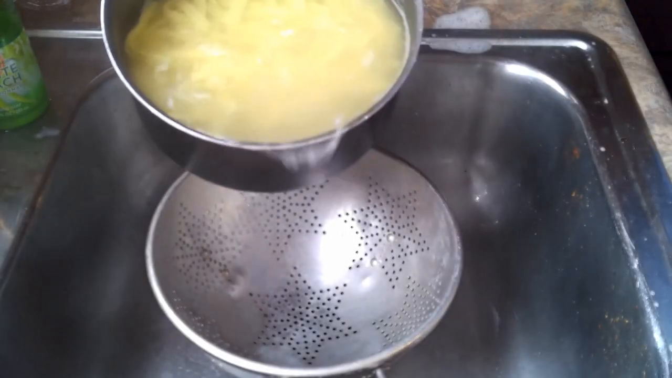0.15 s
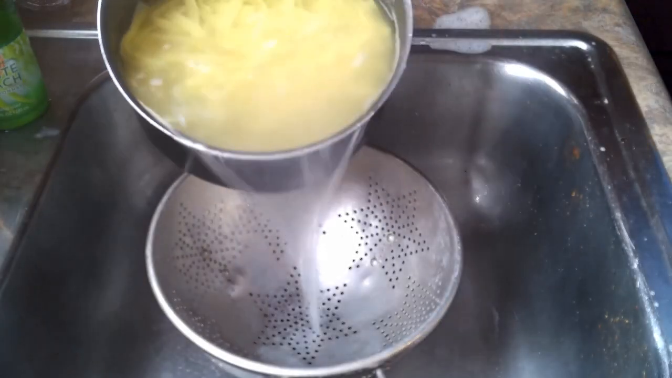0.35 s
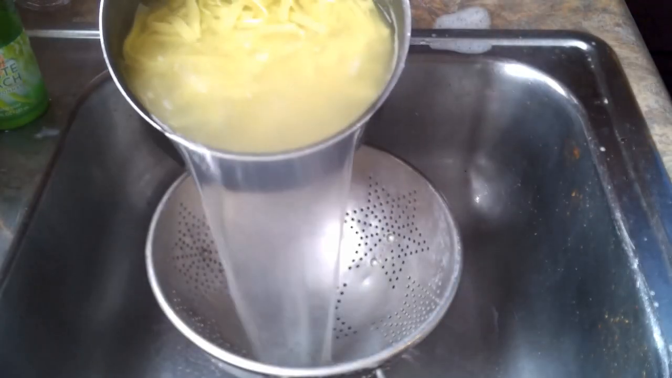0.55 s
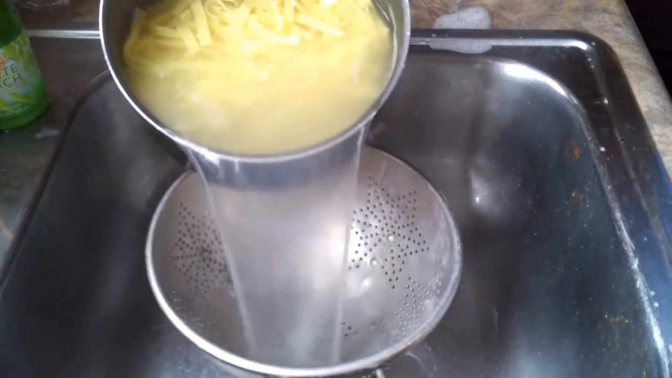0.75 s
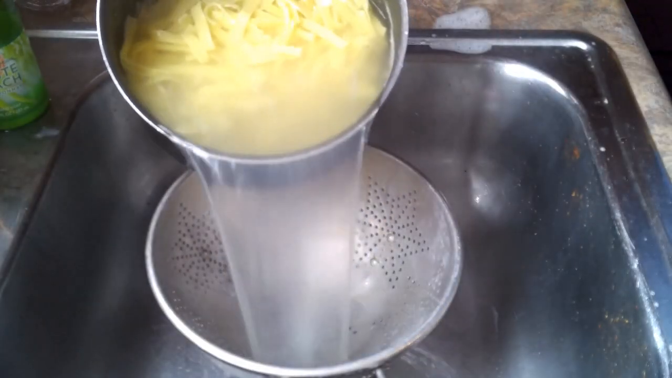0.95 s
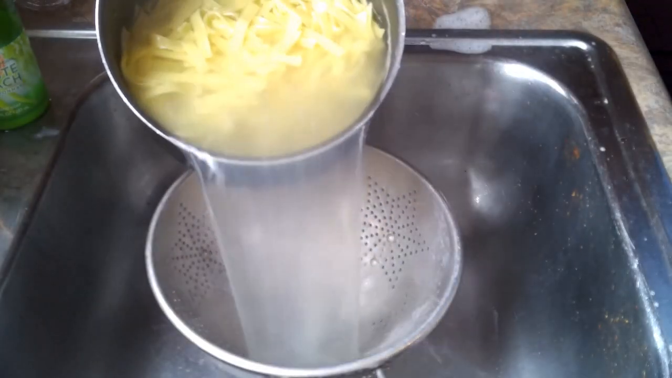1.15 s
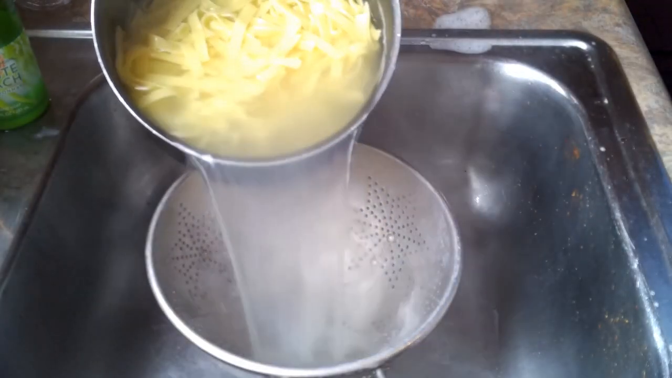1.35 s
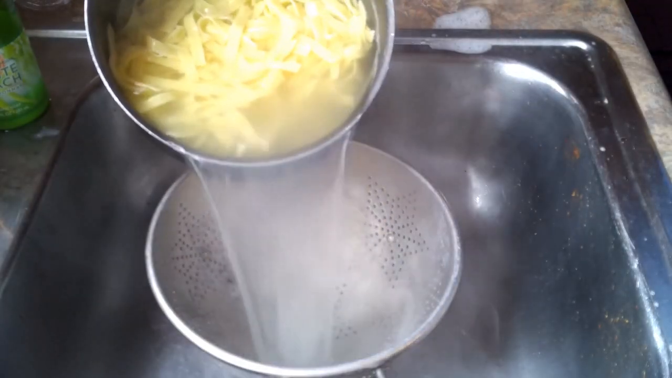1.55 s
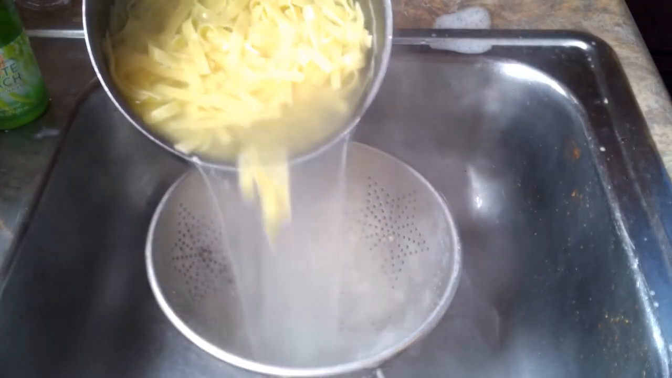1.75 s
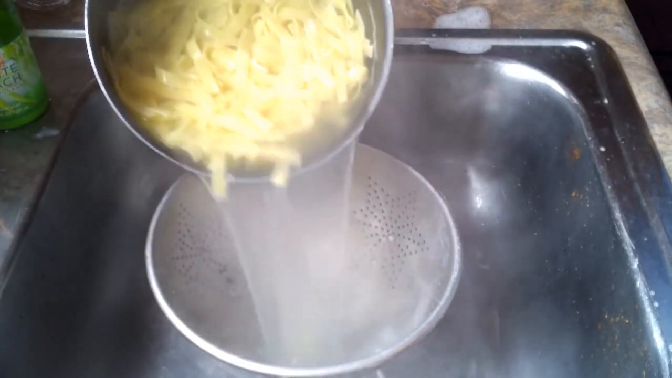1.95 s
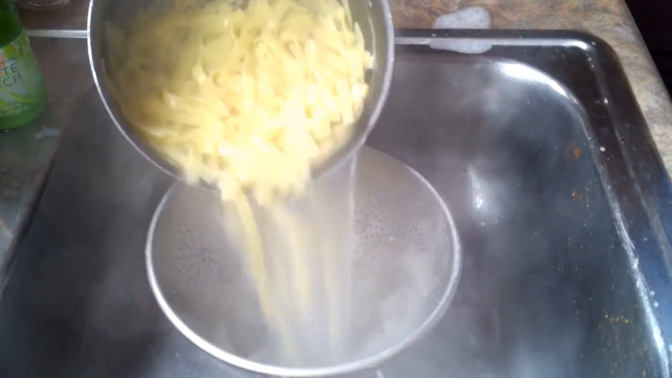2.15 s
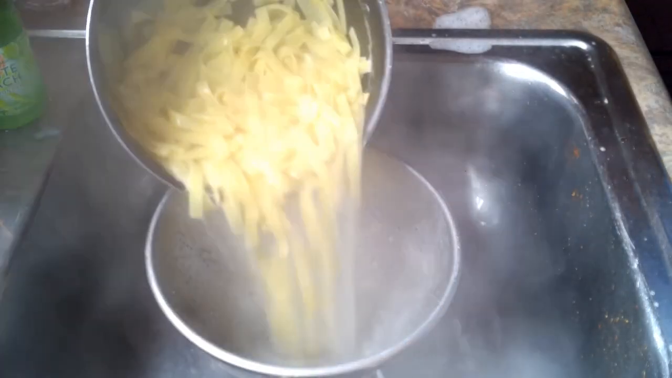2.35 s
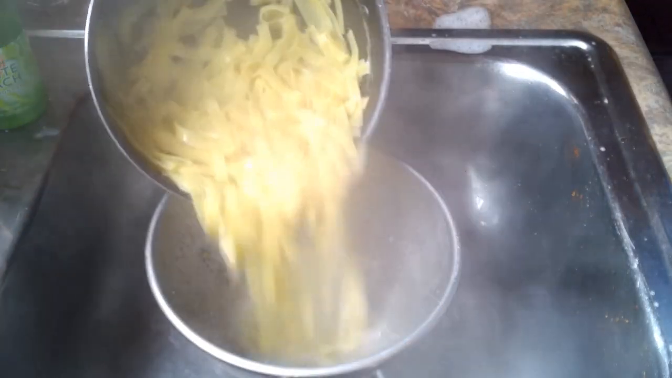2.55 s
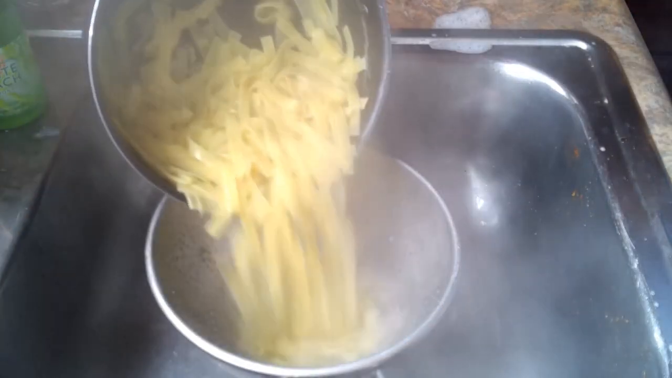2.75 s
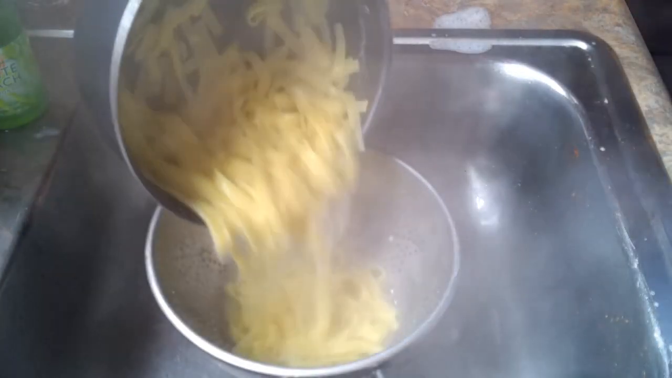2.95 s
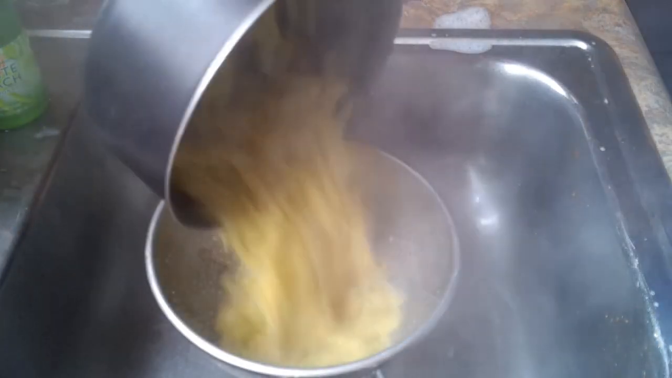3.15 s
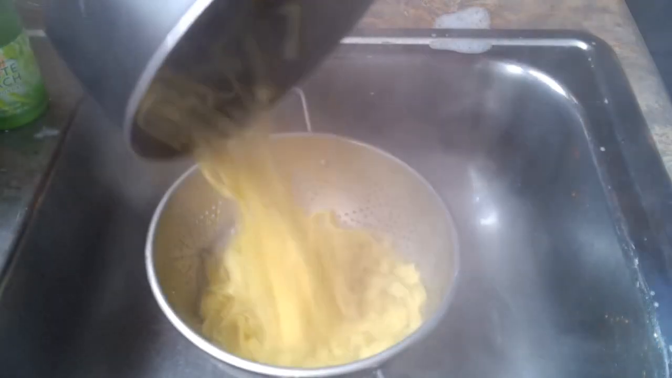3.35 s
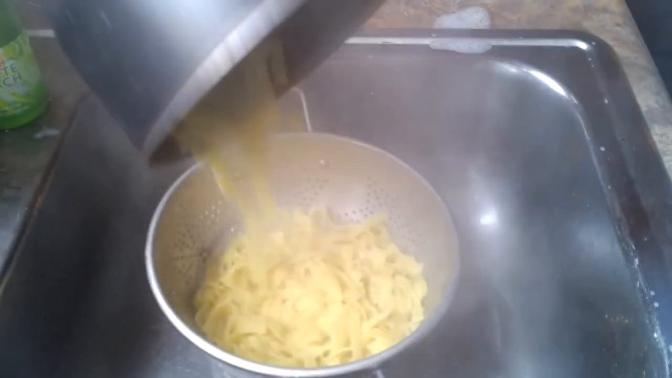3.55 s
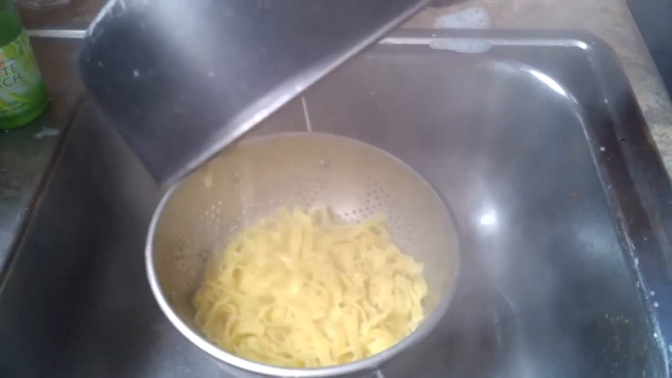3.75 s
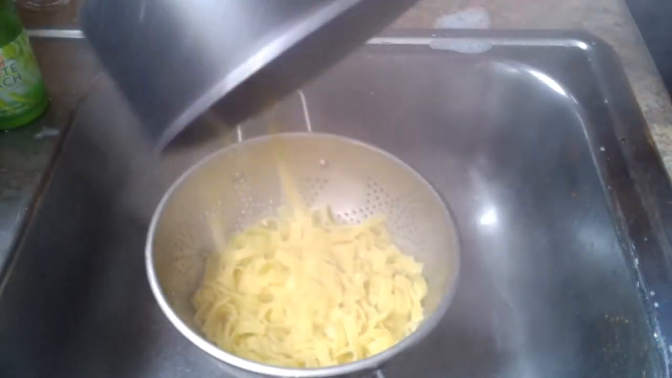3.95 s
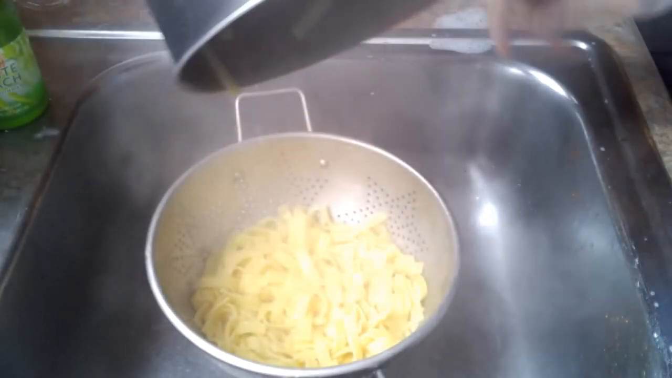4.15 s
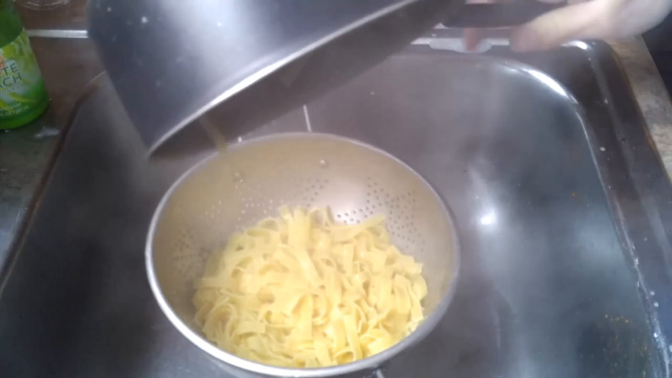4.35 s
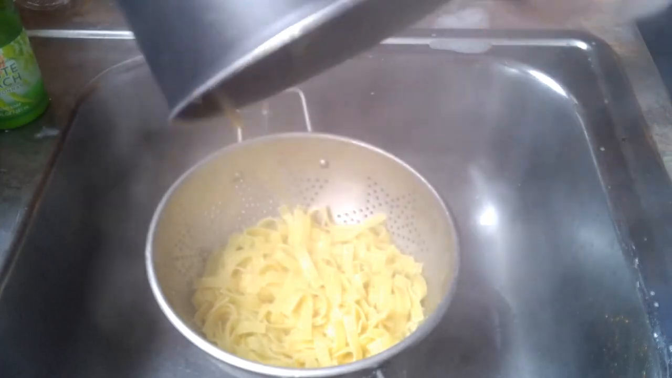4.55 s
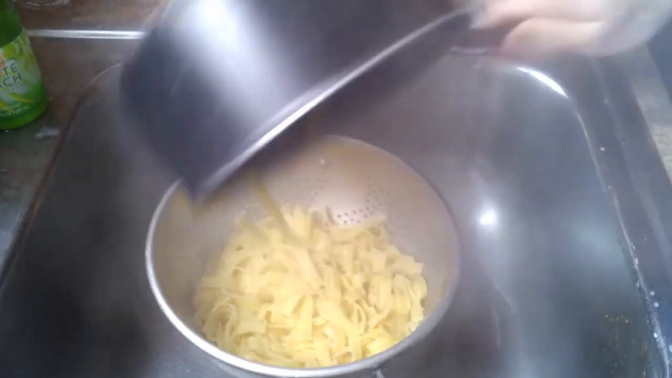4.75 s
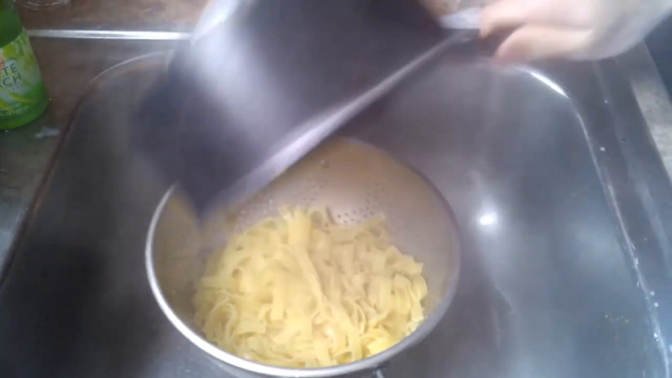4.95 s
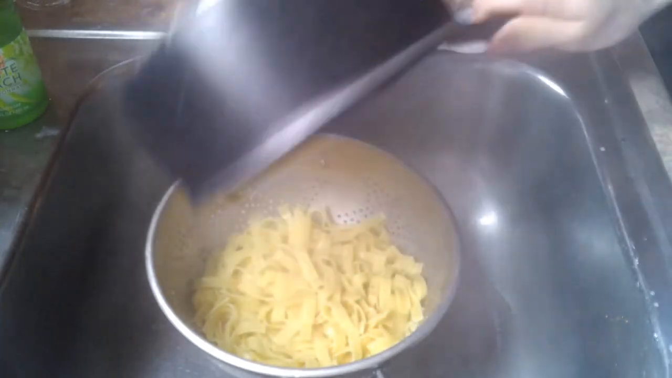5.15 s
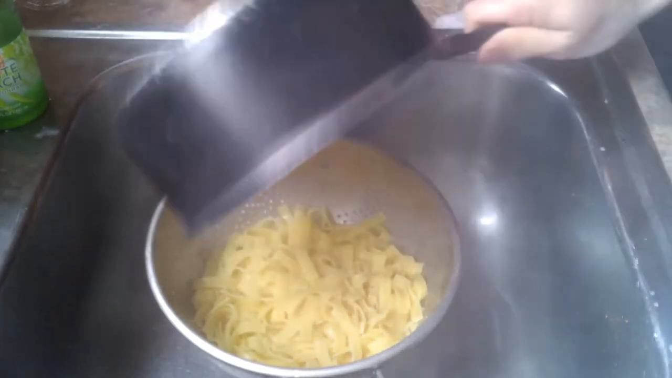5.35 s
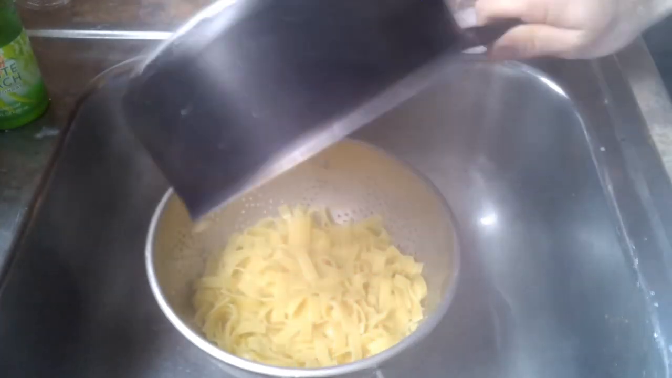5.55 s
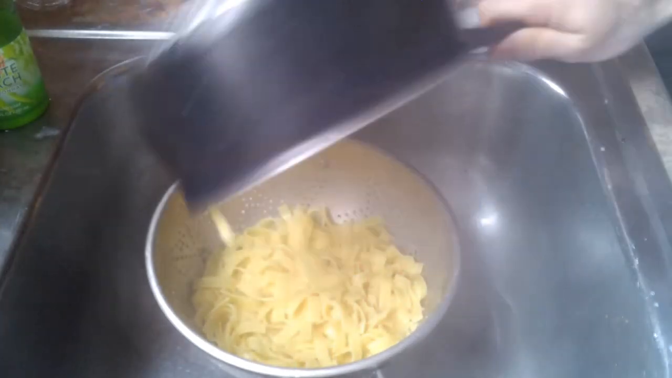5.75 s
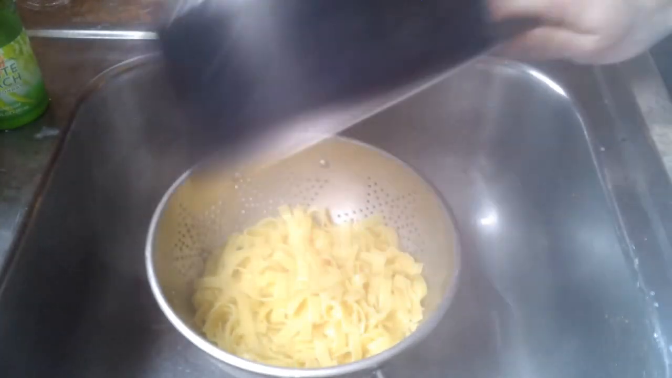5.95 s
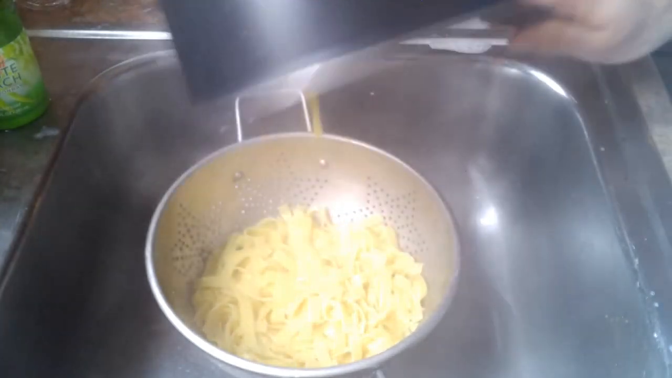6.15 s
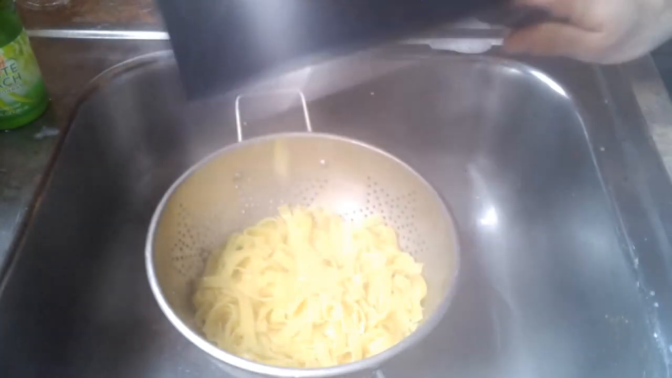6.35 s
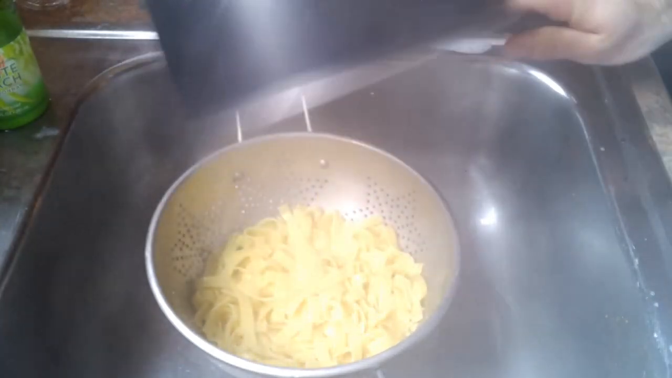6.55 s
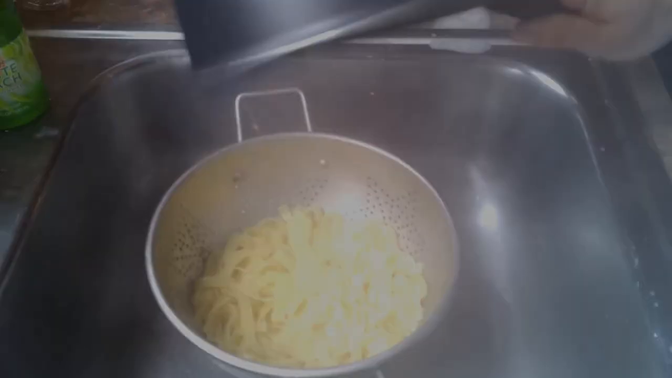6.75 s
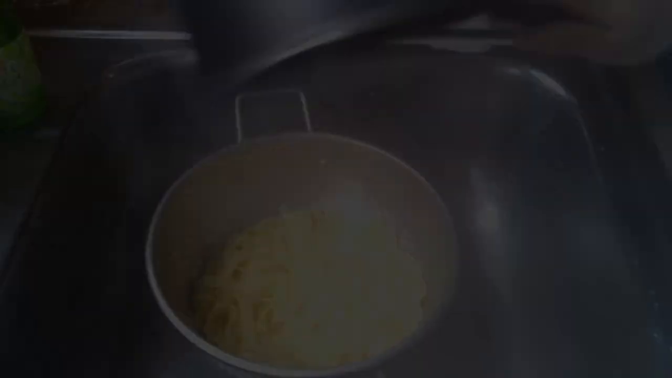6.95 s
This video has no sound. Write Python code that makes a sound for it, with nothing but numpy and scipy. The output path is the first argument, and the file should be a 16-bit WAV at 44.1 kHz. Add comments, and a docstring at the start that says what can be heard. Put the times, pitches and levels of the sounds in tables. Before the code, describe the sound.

Close, bright splashing of water poured into a steel colander, with soft noodle thuds, followed by drips, drain glugs and light knocks.

```python
"""Draining noodles in a sink

Hot water and noodles pour from a saucepan into a steel colander, close to a small microphone.
The stream spatters and bubbles, clumps of noodles thud into the bowl, late drops tick on the steel
and the drain pipe gurgles and glugs, with a few light knocks in between.
The microphone's opening lifts bright sounds to one peak."""
import sys
import numpy as np
from scipy import signal
from scipy.fft import rfft, irfft, next_fast_len
from scipy.io import wavfile
from scipy.ndimage import map_coordinates

SR = 44100
rng = np.random.default_rng(int(sys.argv[2]) if len(sys.argv) > 2 else 0)


def persist_wave(psi):
    """Save psi, clipped to +-1, as 16-bit WAV."""
    counts = np.round(np.clip(psi, -1, 1) * 32767).astype(np.int16)
    wavfile.write(sys.argv[1], SR, np.atleast_2d(counts).T)


N = 308259

# the stream over time: t/s, spray level/dB, froth level/dB, bowl ring level/dB
STREAM = [(0.375, -43, -67, -71), (0.45, -46, -62, -60), (0.62, -40.5, -62, -60.5), (0.7, -27.5, -52, -54),
          (0.9, -28.5, -42, -59), (1.05, -27, -38, -62), (1.24, -23.5, -34.5, -51.5),
          (1.55, -30.5, -37, -52.5), (1.88, -30.5, -39, -47.5), (1.96, -28, -35.5, -58),
          (2.08, -29, -37, -46.5), (2.3, -27.5, -35, -44), (2.55, -30, -39, -47), (2.75, -29.5, -34, -47),
          (2.9, -28, -40.5, -52), (3.1, -35, -47, -56.5), (3.17, -27.5, -35, -46),
          (3.345, -30.5, -40, -57.5), (3.375, -31, -29, -39.5), (3.43, -26.5, -34.5, -53.5),
          (3.46, -33, -42, -45.5), (3.56, -37.5, -44.5, -51), (3.8, -34.5, -45.5, -54),
          (3.86, -48, -57, -56), (4.24, -57.5, -63.5, -69), (4.5, -58, -67.5, -79), (4.94, -54.5, -72, -71),
          (5.3, -63, -76, -82), (6.15, -59, -72.5, -68.5), (6.27, -68, -79, -79), (6.44, -52.5, -62, -61),
          (6.73, -68.5, -83.5, -80), (6.99, -77, -100, -98)]
# tone of froth in the steel bowl: f/Hz, level/dB
FROTH_TONE = [(600, -60.5), (950, -7), (1450, -5.5), (2140, -2), (2700, -2), (3350, 2.5), (3800, -1.5),
              (4300, 0), (5200, 0.5), (7000, -16), (9000, -70)]
# tone of a drop in a trickle: f/Hz, level/dB
DRIP_TONE = [(3500, -42.5), (5500, -19), (6300, -3), (6900, 3), (7600, -2.5), (8500, -13.5), (10000, -19.5),
             (12000, -35), (15800, -51)]


def amp(db):
    """Turn decibels into a gain."""
    return 10 ** (np.asarray(db) / 20)


def unit(x):
    """Scale x to an average power of 1."""
    return x / np.sqrt(np.mean(x ** 2) + 1e-20)


def curves(rows):
    """Join timed rows into one curve per column; -120 (silence) before the first row."""
    times, *columns = np.transpose(rows)
    return [np.interp(np.arange(N) / SR, times, column, left=-120) for column in columns]


def wobble(rate):
    """A smooth curve through rate random points a second."""
    return map_coordinates(rng.standard_normal(int(N * rate / SR) + 4), [np.arange(N) * rate / SR])


def coloured(x, tone):
    """Filter x by a tone table (f/Hz, level/dB); white noise keeps its power."""
    size = 8192
    hz, db = np.transpose(tone)
    gain = amp(np.interp(np.log(np.fft.rfftfreq(size, 1 / SR) + 1), np.log(hz + 1), db))
    # fold the filter so that it rings only after a sound, never before
    cepstrum = irfft(np.log(gain + 1e-6), size)
    cepstrum[1:size // 2] *= 2
    cepstrum[size // 2 + 1:] = 0
    response = irfft(np.exp(rfft(cepstrum)), size) * np.ones(x.shape[:-1] + (1,))
    response /= np.linalg.norm(response, axis=-1, keepdims=True)
    return signal.fftconvolve(x, response, axes=-1)[..., :x.shape[-1]]


def noise(tone):
    """Steady noise with the given tone."""
    return coloured(rng.standard_normal(N), tone)


def puffs(shape, tone):
    """One puff of noise for each row of shape, with a peak of 1."""
    rows = coloured(shape * rng.standard_normal(shape.shape), tone)
    return rows / np.abs(rows).max(axis=1, keepdims=True)


def place(times, sounds):
    """Add up short sounds, one per row, each starting at its time."""
    at = np.round(np.asarray(times) * SR).astype(int)[:, None] + np.arange(sounds.shape[1])
    return np.bincount(at.ravel(), sounds.ravel(), N + SR)[:N]


def bubbles(hz, cycles, rise, size):
    """Fading tones, one per row; the pitch climbs as a bubble nears the surface."""
    turns = np.arange(size) / SR * np.asarray(hz)[:, None]
    age = turns / cycles
    wave = np.sin(2 * np.pi * turns * (1 + rise * np.minimum(age, 2)))
    return wave * np.exp(-age) * (1 - np.exp(-2 * turns))


def kitchen():
    """Steady room noise, microphone hiss and a faint high whine."""
    # room and hiss: f/Hz, level/dB
    room_tone = [(12, -38), (20, -0.5), (456, -13.5), (510, -13.5), (969, -19), (2500, -24), (2960, -24),
                 (6650, -24.5), (15800, -25)]
    # whine: f/Hz, level/dB
    whine_tone = [(6500, -58), (6700, -22), (6740, -1.5), (6780, -14), (7000, -56.5)]
    return amp(-64) * noise(room_tone) + amp(-79) * noise(whine_tone)


def rumble():
    """A low rumble while the steam rises."""
    # its swell: t/s, level/dB
    swell = [(1.8, -78), (2.37, -60), (2.61, -68.5), (2.95, -52.5), (3.18, -61), (3.64, -57.5),
             (3.89, -60.5), (4.6, -82)]
    # its tone: f/Hz, level/dB
    tone = [(10, 5), (25, 8.5), (40, 1), (80, -6.5), (160, -39)]
    return amp(curves(swell + [(4.7, -120)])[0]) * noise(tone)


def gurgle():
    """Lumpy flow makes the air in the drain pipe ring at two pitches."""
    # water in the pipe: t/s, level/dB, share of the upper pitch/0-1
    flow = [(4.0, -67, 0.2), (4.17, -62.5, 0.1), (4.52, -67.5, 0.8), (4.62, -59, 0), (5.1, -60.5, 0),
            (5.3, -62, 0.43), (5.56, -62, 0.78), (6.2, -55, 0.76), (6.37, -67, 0.7), (6.48, -46.5, 0.44),
            (6.66, -64, 0.54), (6.99, -80, 0.6)]
    # the air's two resonances: f/Hz, width/Hz
    pipe = [(318, 23), (410, 28)]
    size = next_fast_len(N + SR)
    f = np.fft.rfftfreq(size, 1 / SR)
    lumps = rfft(amp(4.8 * wobble(30)) * rng.standard_normal(N), size)
    filters = [1j * f * width / (hz * hz - f * f + 1j * f * width) for hz, width in pipe]
    low, high = [unit(irfft(lumps * gain, size)[:N]) for gain in filters]
    flow_db, upper = curves(flow)
    return amp(flow_db) * ((1 - upper) * low + upper * high)


def glugs_and_knocks():
    """Low glugs from the drain and a few light knocks, each a short rising note with a rough puff."""
    # glugs and knocks: t/s, level/dB, starting f/Hz, length/s
    events = [(4.05, -43, 240, 0.023), (4.127, -38.5, 191, 0.024), (4.157, -45, 306, 0.02),
              (4.225, -43, 230, 0.028), (4.747, -40.5, 306, 0.022), (4.959, -42.5, 313, 0.019),
              (5.539, -43.5, 328, 0.017), (5.699, -45, 403, 0.012), (5.77, -38, 177, 0.021),
              (5.839, -46, 215, 0.018), (5.906, -34.5, 217, 0.013), (5.981, -43.5, 205, 0.02),
              (6.033, -26.5, 331, 0.017), (6.068, -21, 322, 0.013), (6.117, -36.5, 308, 0.019),
              (6.159, -34.5, 396, 0.0049), (6.19, -43, 391, 0.018), (6.293, -46, 393, 0.02),
              (6.33, -30, 171.5, 0.066), (6.361, -25, 180, 0.033), (6.395, -23, 307.6, 0.036),
              (6.427, -19.5, 322, 0.027), (6.473, -32.5, 320, 0.022), (6.509, -37, 354, 0.011),
              (6.555, -36, 277, 0.017), (6.752, -49.5, 574, 0.014)]
    # the rough puff: f/Hz, level/dB
    puff_tone = [(40, -21), (90, -6), (300, 10), (480, -3.5), (700, -26), (1500, -32), (4000, -100)]
    puff_share = 0.39
    t = np.arange(6000) / SR
    start, db, hz, length = np.transpose(events)[:, :, None]
    swell = (1 - np.exp(-t / 0.0035)) * np.exp(-(t / np.clip(length, .005, 1)) ** 1.44)
    phase = 2 * np.pi * hz * t * (1 + 0.82 * t)
    note = swell * (np.sin(phase) + 0.021 * np.sin(2 * phase))
    mix = (1 - puff_share) * note + puff_share * puffs(swell, puff_tone)
    return place(start[:, 0], amp(db) * mix)


def drumming():
    """The stream drums on bowl and sink; the empty bowl hums until standing water damps it."""
    # bowl wall: f/Hz, level/dB
    wall_tone = [(200, -38), (320, -4), (450, -0.5), (620, 1), (850, -2), (1500, -48), (4000, -100)]
    # sink basin: f/Hz, level/dB
    basin_tone = [(30, -20), (70, -3), (170, -2), (300, -7.5), (450, -26), (2000, -100)]
    # empty bowl: f/Hz, level/dB
    hum_tone = [(150, -49), (260, -2.5), (310, 3), (370, -14), (600, -42)]
    filled_s, damping_s = 1.63, 0.043
    froth_db = curves(STREAM)[1]
    pouring = froth_db > -119
    drum_db = np.where(pouring, -53 + 0.18 * (froth_db + 37.5), froth_db)
    on_wall = np.clip((froth_db + 71.5) / 22, .15, 1)  # a trickle barely shakes the wall
    steel = 0.85 * on_wall * noise(wall_tone) + 0.5 * noise(basin_tone)
    drum = steel * amp(drum_db + 2.6 * wobble(25))
    undamped = pouring / (1 + np.exp((np.arange(N) / SR - filled_s) / damping_s))
    return drum + amp(-62.5 + 2.3 * wobble(15)) * undamped * noise(hum_tone)


def noodles():
    """Clumps thud into the colander: soft ones ring its low notes, hard ones its high notes."""
    # landings: t/s, level/dB, softness/0-1
    clumps = [(2.046, -27, 0.09), (2.074, -36, 0.9), (2.25, -31.5, 0.03), (2.333, -34, 0.8),
              (2.349, -26, 0.73), (2.689, -30.5, 0.6), (2.706, -23, 0.65), (3.094, -24.5, 0.4),
              (3.207, -40.5, 0), (3.345, -30.5, 0.53), (3.631, -25.5, 0.13)]
    # notes of the loaded colander: f/Hz, level/dB, time to fade by 60 dB/s
    bowl_notes = [(156, -2, .09), (215, -3, .05), (490, -4, .05), (637, -5, .07)]
    # dull thump of a clump: f/Hz, level/dB
    thump_tone = [(50, -17.5), (100, -4), (200, -4.5), (500, -9.5), (800, -8.5), (1500, -31), (4000, -84.5)]
    t = np.arange(8192) / SR
    hz, note_db, fade_s = np.transpose(bowl_notes)[:, :, None]
    rings = []
    for _, db, softness in clumps:
        detune = 1 + .05 * rng.standard_normal(hz.shape)  # the load shifts
        level = db - 3.5 + note_db + 16 * (.5 - softness) * np.log2(hz / 300)
        notes = amp(level - 60 * t / fade_s) * np.sin(2 * np.pi * hz * detune * t)
        rings.append(notes.sum(axis=0) * (1 - np.exp(-t / 0.0034)))
    start, clump_db, _ = np.transpose(clumps)
    shape = amp(-60 * t / 0.084) * (1 - np.exp(-t / 0.0007))
    thumps = amp(clump_db - 10.5)[:, None] * puffs(np.tile(shape, (len(clumps), 1)), thump_tone)
    return place(start, np.array(rings) + thumps)


def froth():
    """Small bubbles crowd over a wash of noise, large ones plop and the bowl rings hollow."""
    # air in the bowl: f/Hz, level/dB
    ring_tone = [(800, -38), (960, -5.5), (1080, -2), (1250, -3), (1700, -32)]
    # large bubbles: t/s, level/dB, starting f/Hz
    large_bubbles = [(0.728, -26, 3200), (0.976, -21, 3320), (0.995, -21.5, 3370), (1.0559, -18.5, 3160),
                     (1.1012, -20, 3200), (1.1188, -18.5, 4200), (1.244, -19, 1382), (1.338, -23, 3440),
                     (1.396, -25, 2000), (1.482, -18, 3440), (1.4962, -17.5, 2020), (1.8815, -24.5, 2740),
                     (2.0172, -10.5, 4300), (2.1023, -18.5, 4840), (2.118, -27, 2010), (2.427, -19, 4200),
                     (2.487, -21.5, 2580), (2.5875, -27, 3340), (2.6198, -18, 4600), (2.8256, -16.5, 3980),
                     (2.869, -19.5, 4700), (3.122, -17.5, 4570), (3.169, -20.5, 3200), (3.3038, -25, 1830),
                     (3.4697, -15.5, 4100), (3.5143, -29, 1250), (3.673, -26.5, 3760), (3.979, -36, 4600),
                     (4.053, -47, 1050), (4.1672, -43, 3230), (5.066, -50, 3250), (5.411, -50, 4900),
                     (5.4233, -41.5, 5000), (5.432, -45, 4800), (5.573, -55, 1170), (5.703, -55, 3100)]
    _, froth_db, ring_db = curves(STREAM)
    when, pitch, strength = rng.random((9000, 3)).T
    small = bubbles(1500 * 3.6 ** pitch, cycles=6, rise=0.013, size=400)
    crowd = unit(place(when * N / SR, small * amp(15 * strength[:, None] ** 5)))
    lumps = amp(1.3 * wobble(9) + 1.6 * wobble(20))
    foam = amp(froth_db) * unit(crowd + 1.5 * noise(FROTH_TONE)) * lumps
    ring = noise(ring_tone) * amp(ring_db + 2.2 * wobble(30))
    start, db, hz = np.transpose(large_bubbles)
    plops = amp(db)[:, None] * bubbles(hz, cycles=7.3, rise=0.039, size=1500)
    return foam + ring + place(start, plops)


def splashes():
    """Drops burst on the steel: a crack, a bright puff, a duller slap and a tail from the sink."""
    # bursts: t/s, level/dB, time to fade by 60 dB/s, slap relative to the burst/dB
    bursts = [(0.378, -45, 0.035, -28), (0.395, -34.5, 0.038, -17), (0.4544, -34, 0.035, -22),
              (0.5092, -42, 0.032, -24), (0.5362, -34, 0.03, -28), (0.5651, -27.5, 0.035, -35),
              (0.6528, -18.5, 0.035, -20), (0.6833, -19, 0.035, -35), (0.7276, -41.5, 0.029, -8),
              (0.7488, -8, 0.064, -28), (0.924, -19, 0.096, -10), (1.0096, -20, 0.043, -11),
              (1.0435, -13, 0.054, -5), (1.082, -31, 0.03, -20), (1.1054, -17.5, 0.026, -18),
              (1.1727, -30, 0.025, -22), (1.2087, -15, 0.029, -11), (1.2588, -17.5, 0.035, -13),
              (1.337, -15, 0.02, -17), (1.5507, -15.5, 0.028, -21), (1.6382, -23, 0.035, -15),
              (1.6571, -14.5, 0.044, -10), (1.8944, -15, 0.013, -18), (1.9376, -13, 0.014, -12),
              (1.9794, -15.5, 0.025, -13), (2.0182, -23, 0.038, -1), (2.0953, -17.5, 0.031, -13),
              (2.1775, -16.5, 0.025, -17), (2.194, -29, 0.029, -22), (2.2383, -19.5, 0.038, -12),
              (2.2975, -17, 0.048, -6.5), (2.46, -15.5, 0.053, -8), (2.5875, -16.5, 0.1, -5.5),
              (2.6235, -13.5, 0.032, -7), (2.6778, -12.5, 0.035, -21), (2.692, -14.5, 0.035, -24.5),
              (2.7116, -1.5, 0.029, -17.5), (2.752, -14, 0.023, -31), (2.8, -15, 0.019, -26),
              (2.825, -13, 0.055, -11), (2.838, -12.5, 0.031, -25), (2.868, -8.5, 0.014, -33),
              (2.912, -21.5, 0.026, -19), (2.9769, -15, 0.029, -8.5), (3.034, -14, 0.012, -8),
              (3.1202, -18, 0.026, -6.5), (3.1438, -13.5, 0.018, -3), (3.1694, -19.5, 0.035, -13),
              (3.2121, -13, 0.03, 1.5), (3.3052, -13.5, 0.017, -8), (3.3538, -8.5, 0.024, -19),
              (3.3718, -13.5, 0.029, -12), (3.388, -14, 0.035, -26), (3.4227, -11, 0.025, -11),
              (3.457, -20, 0.026, 2), (3.4691, -13, 0.035, -9), (3.516, -13.5, 0.015, -8),
              (3.5673, -20, 0.048, -26), (3.6143, -21.5, 0.028, -25), (3.6528, -20.5, 0.03, -18),
              (3.6786, -15, 0.032, -12), (3.704, -30, 0.03, -23), (3.7266, -21.5, 0.057, -27),
              (3.9073, -36.5, 0.042, -22), (3.9422, -25, 0.073, -27), (4.0346, -30.5, 0.068, -17),
              (4.0682, -39, 0.038, -13), (4.1644, -42.5, 0.049, -6), (4.3151, -44.5, 0.035, -13),
              (4.5915, -45, 0.026, -21), (4.7321, -44, 0.028, -29), (4.917, -46, 0.035, -8.5),
              (5.3224, -44, 0.029, -26), (5.419, -44, 0.059, -24), (5.466, -48, 0.035, -9),
              (5.6012, -43.5, 0.053, -14), (5.7906, -46, 0.042, -14), (5.911, -29.5, 0.035, -25),
              (5.9826, -45, 0.04, -21), (6.11, -42.5, 0.056, -11), (6.1998, -45, 0.035, -20),
              (6.2876, -31, 0.078, -35), (6.4163, -42.5, 0.037, -8), (6.5131, -47, 0.041, -21),
              (6.8694, -43.5, 0.045, -31)]
    # a big splash: f/Hz, level/dB
    splat_tone = [(2500, -47), (4900, -14.5), (5750, -11), (6300, -0.5), (6950, 4.5), (7600, -4),
                  (8400, -9), (10900, -29), (12500, -38), (15800, -49.5)]
    t = np.arange(6000) / SR
    start, db, fade_s, slap_db = np.transpose(bursts)[:, :, None]
    crack = amp(2.5 + .2 * (db - db.max()) - 60 * t / 0.0017)  # small drops land softly
    tail = amp(-8.5 - 60 * t / 0.19)
    shape = crack + amp(-60 * t / fade_s) + tail
    big = np.clip((db + 33) / 12, 0, 1)
    bright = big * puffs(shape, splat_tone) + (1 - big) * puffs(shape, DRIP_TONE)
    slap = amp(slap_db) * puffs(shape, FROTH_TONE)
    return place(start[:, 0], amp(db) * (bright + slap))


def spray():
    """Droplets burst at random as sharp puffs of noise; faint, sparse ticks sit in the highest treble."""
    # spray through the microphone's opening: f/Hz, level/dB
    spray_tone = [(1500, -53.5), (2500, -24.5), (4900, -16.5), (5750, -10.5), (6300, -3), (6950, 0),
                  (7600, -4.5), (8400, -14.5), (10900, -31), (12500, -40), (14400, -49), (15800, -77)]
    # faint treble ticks: f/Hz, level/dB
    tick_tone = [(8000, -52.5), (10500, -5.5), (12000, -9.5), (14500, -1), (15800, -17.5)]
    puff_fade_s, tick_fade_s = 0.012, 0.008
    spray_db = curves(STREAM)[0]
    t = np.arange(1024) / SR
    when, strength = rng.random((4000, 2)).T
    hits = place(when * N / SR, amp(8.0 * strength[:, None] ** 5.1))
    bursts = unit(signal.fftconvolve(hits, amp(-60 * t / puff_fade_s))[:N])
    hiss = np.clip((spray_db + 87.5) / 35, .3, 2)  # a full stream merges the drops
    shape = (bursts + hiss) / np.sqrt(1 + hiss ** 2 + 2.67 * hiss)
    patter = shape * amp(1.8 * wobble(14)) * rng.standard_normal(N)
    broad = np.clip((spray_db + 64) / 21, 0, 1)  # a stream reaches lower pitches than a trickle
    drops = broad * coloured(patter, spray_tone) + (1 - broad) * coloured(patter, DRIP_TONE)
    when, strength = rng.random((1200, 2)).T
    ticks = unit(place(when * N / SR, amp(22 * strength[:, None] ** 4 - 60 * t[:600] / tick_fade_s)))
    treble = amp(-38 + 4 * wobble(12)) * coloured(ticks * rng.standard_normal(N), tick_tone)
    return amp(spray_db) * (drops + treble)


def scene():
    """The pour over the kitchen and drain sounds, in one channel."""
    background = kitchen() + rumble() + gurgle() + glugs_and_knocks()
    pour = drumming() + noodles() + froth() + splashes() + spray()
    return (background + pour)[None]


def record(dry):
    """Cut away the very highest treble."""
    top_hz = 15800
    size = next_fast_len(N + SR)
    kept = np.fft.rfftfreq(size, 1 / SR) < top_hz
    return irfft(rfft(dry, size) * kept, size)[:, :N]


dry = scene()
out = record(dry)
persist_wave(out)
```